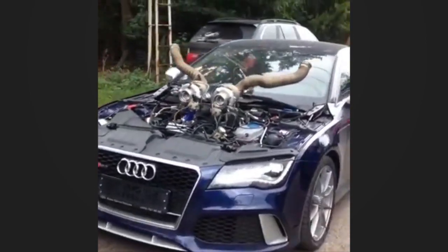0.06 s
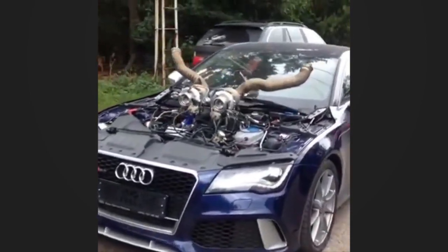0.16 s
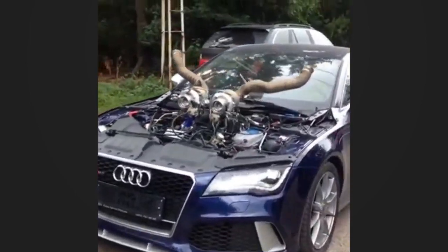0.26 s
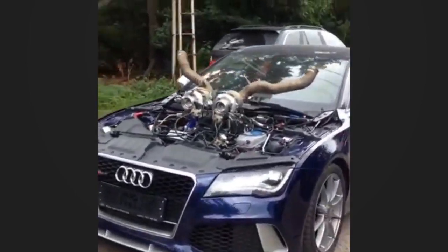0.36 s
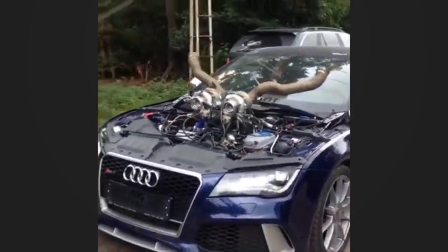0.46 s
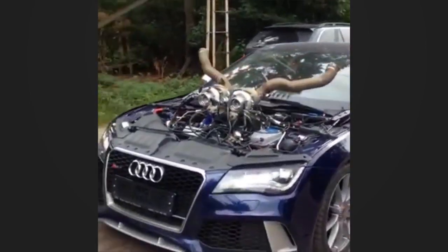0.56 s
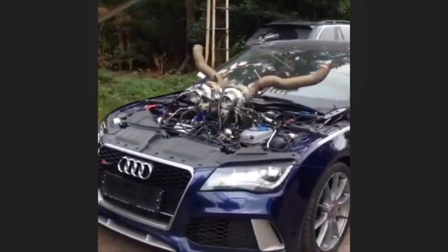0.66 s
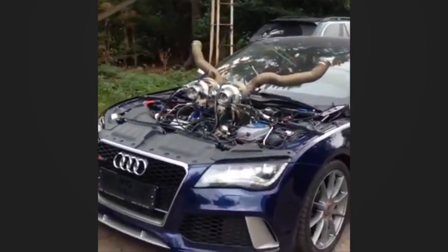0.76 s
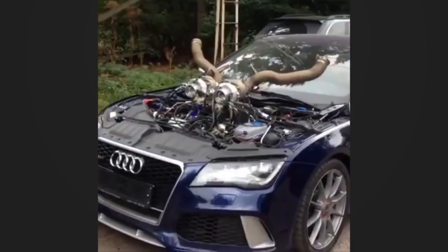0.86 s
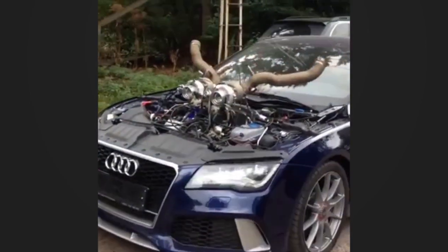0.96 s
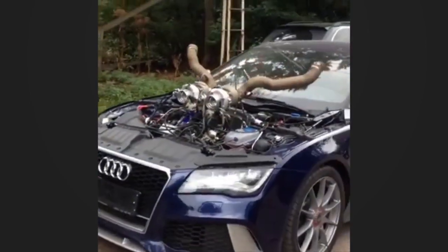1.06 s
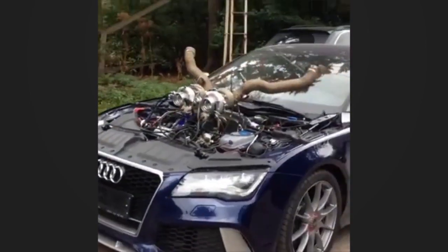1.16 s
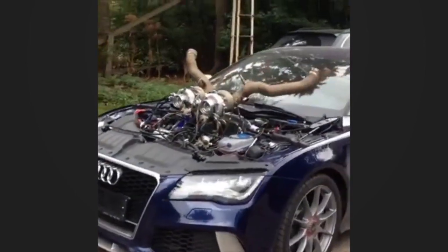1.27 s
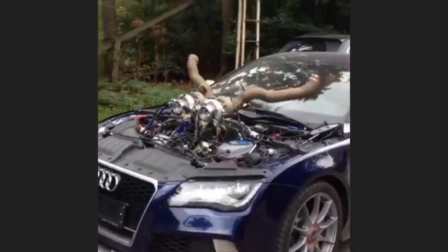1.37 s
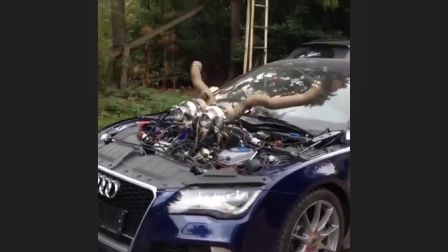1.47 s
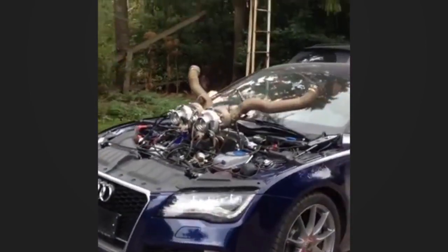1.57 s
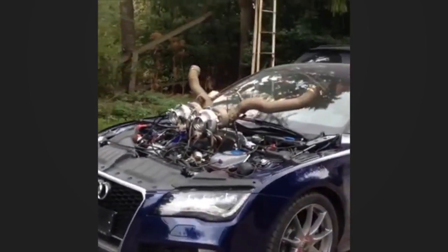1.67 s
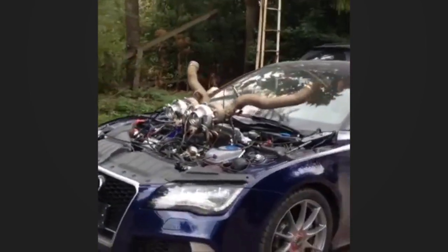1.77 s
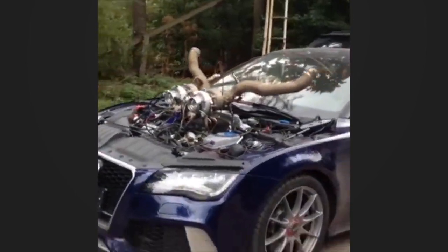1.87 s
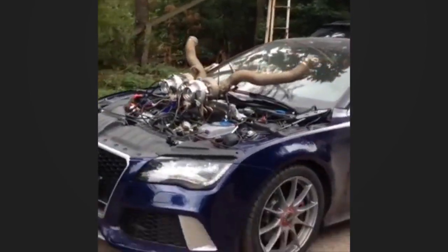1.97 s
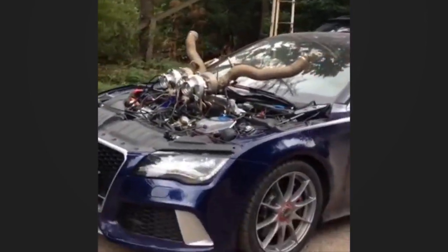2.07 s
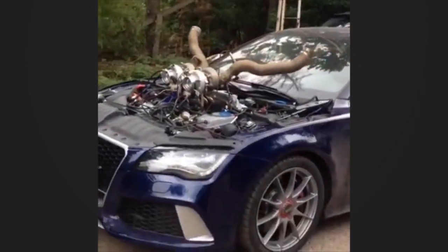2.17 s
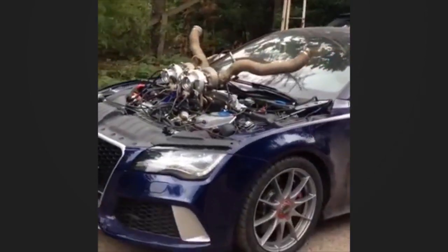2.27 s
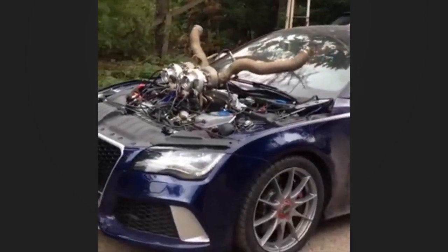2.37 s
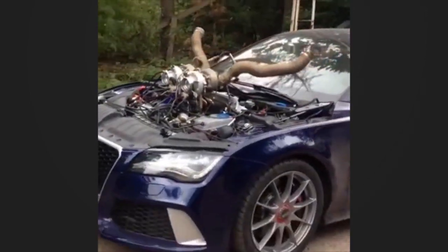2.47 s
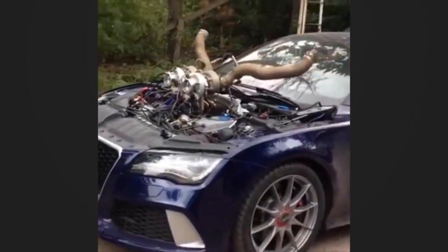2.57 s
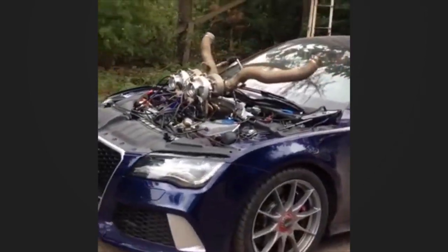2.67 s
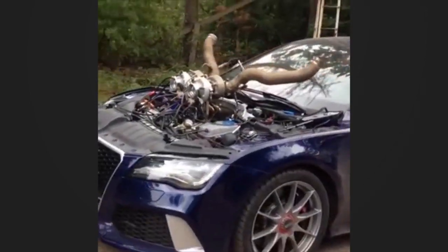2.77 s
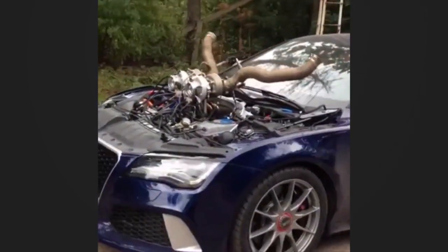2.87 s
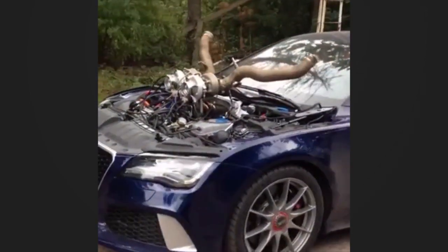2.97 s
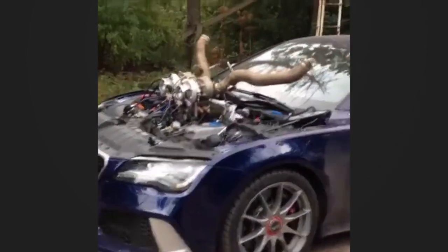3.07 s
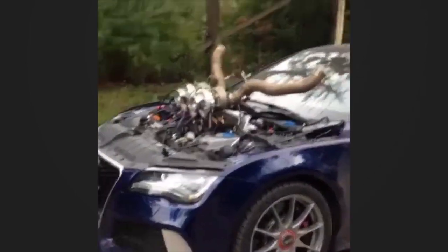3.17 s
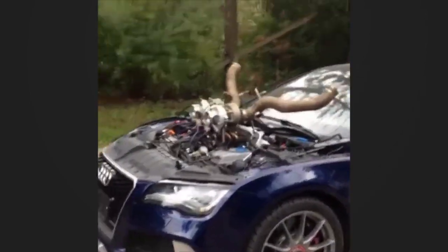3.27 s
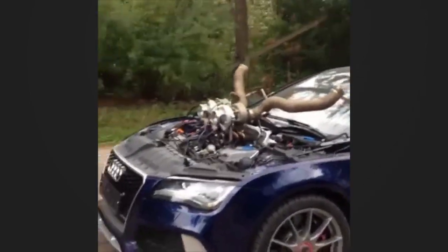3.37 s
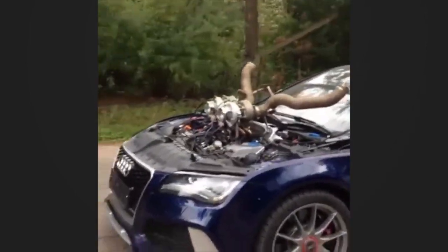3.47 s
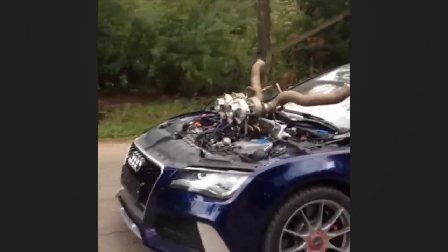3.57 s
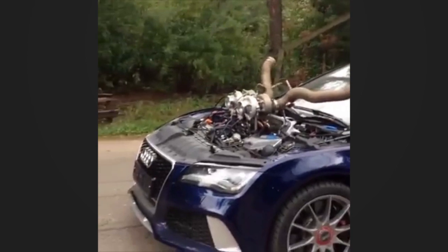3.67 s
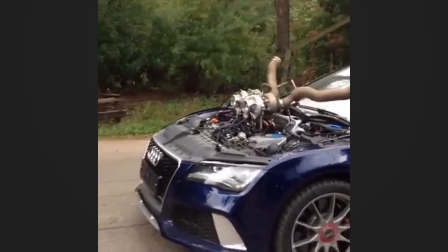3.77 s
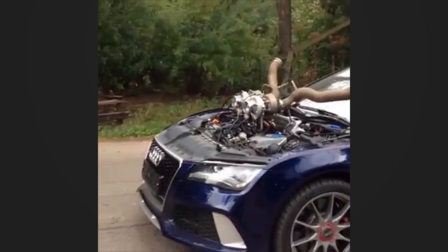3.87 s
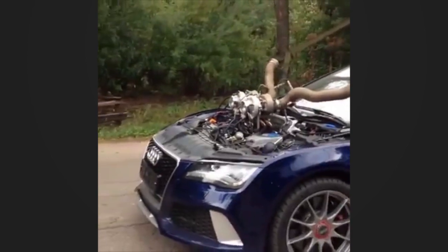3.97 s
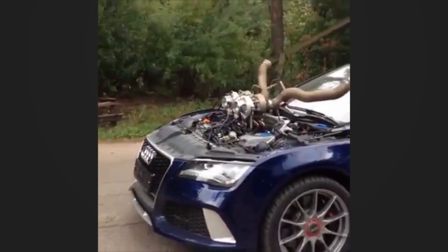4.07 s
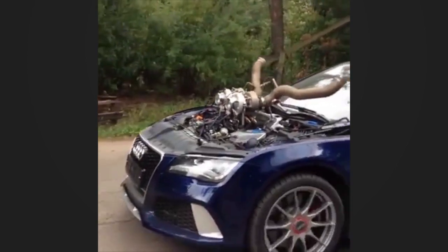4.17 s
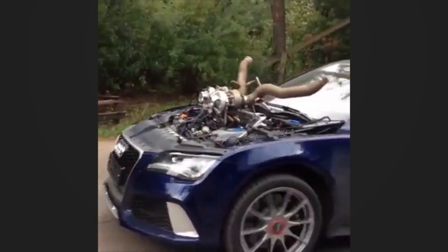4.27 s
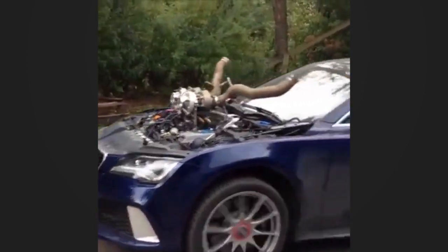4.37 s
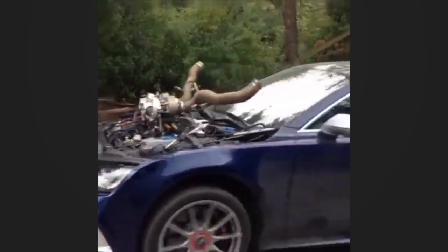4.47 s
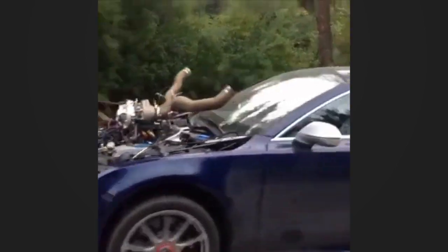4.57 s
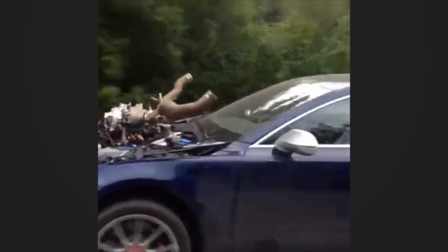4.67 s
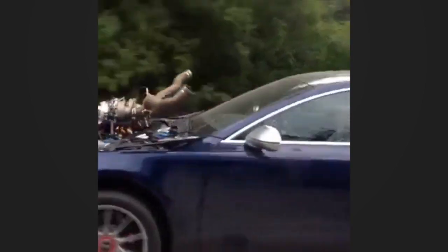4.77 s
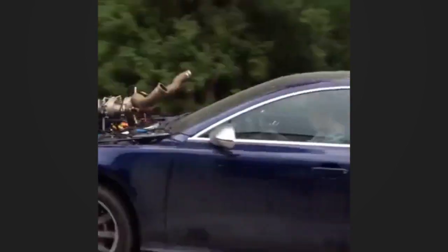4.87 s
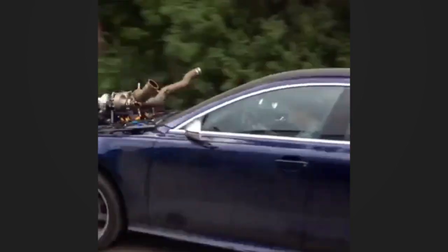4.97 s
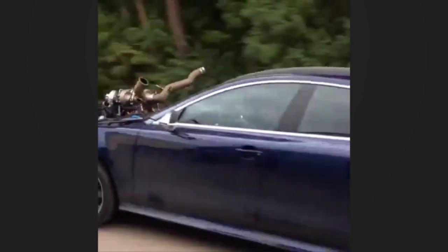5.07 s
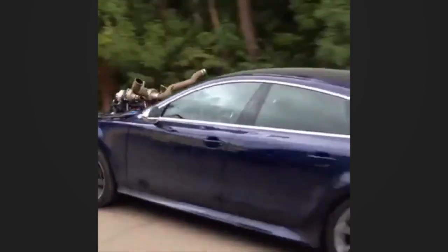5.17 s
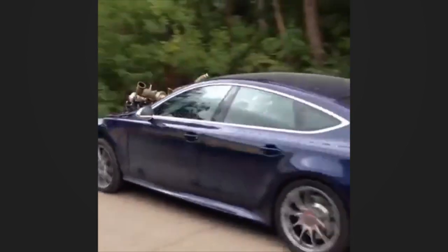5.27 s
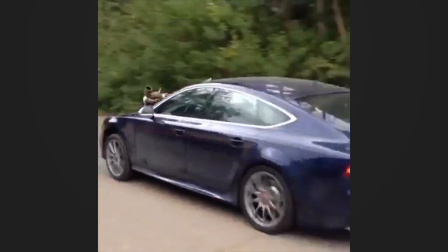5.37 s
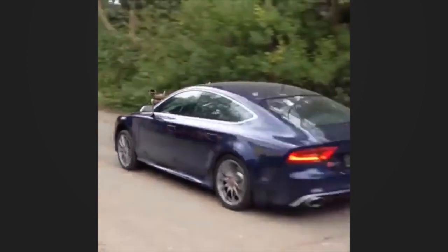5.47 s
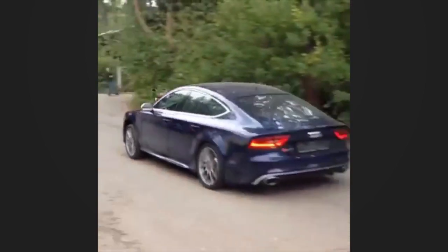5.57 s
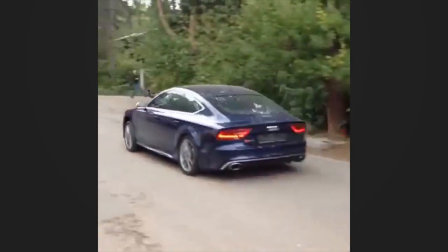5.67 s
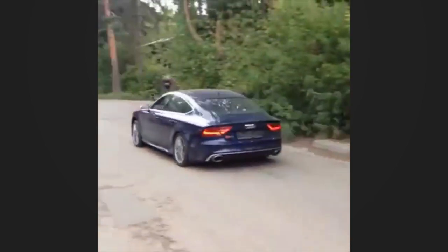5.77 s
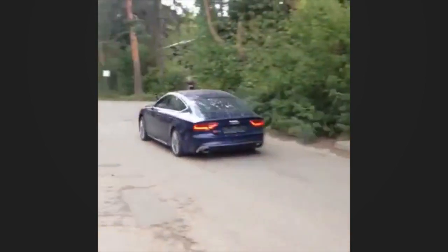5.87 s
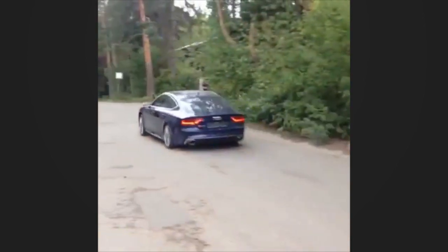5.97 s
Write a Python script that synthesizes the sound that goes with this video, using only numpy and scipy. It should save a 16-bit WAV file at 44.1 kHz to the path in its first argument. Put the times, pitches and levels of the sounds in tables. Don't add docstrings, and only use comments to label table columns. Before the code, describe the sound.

A close mono outdoor microphone hears a burbling, lumpy idle under hissing engine noise. Around three seconds the throttle snaps open with a tiny whoosh, and unmuffled exhaust roars, turbine hiss brightening. Pitch surges, hovers and dips slightly, then sweeps up as the car drives by, its tone hollowing behind the body before ragged limiter cuts. Dull tree echoes and low wind bumps surround it.

```python
import sys
import numpy as np
from scipy import signal
from scipy.io import wavfile
from scipy.ndimage import uniform_filter1d

SR = 44100
rng = np.random.default_rng(int(sys.argv[2]) if len(sys.argv) > 2 else 0)


def dump_mix(stems):
    frames = np.atleast_2d(stems).T
    limited = np.clip(frames, -1, 1)
    pcm = np.round(limited * 32767).astype(np.int16)
    wavfile.write(sys.argv[1], SR, pcm)


def ratio_of_db(decibels):
    return 10 ** (np.asarray(decibels, float) / 20)


N = 265482

FAR_BANK = [0, 1, 0, 0, 1, 0, 1, 1]
# (thump [dB], bark [dB], rasp [dB], runner delay [ms])
CYLINDERS = [(2.5, -2.5, 1.5, 0.5), (0, -9, -5.5, 0.15), (1.3, -5.5, 1.5, 0.03), (-4, 1, 0, 0.33),
             (0, -9, -10, 0.33), (1.5, -1, 1.1, 0.59), (-1, -8.5, -9.5, .02), (-2, -17, -2.5, 0.45)]
# (frequency [Hz], width [Hz], level cold at idle [dB], level under load [dB])
THUMP_MODES = [(136.3, 27, 2, -23), (177, 40, -11, -33)]
BARK_MODES = [(229, 86, -6, 10), (307.3, 35, 12, 14), (364, 20, -59, 11), (506, 33, -9, -6)]
RASP_MODES = [(720, 56, 5, -4), (1015, 30, -1, 3.5), (1397, 43, 1, 3.5), (1702, 38, 3.5, -2),
              (2028, 77, 4, -2), (2770, 540, -21, -9), (3354, 13.5, 4, 5)]
# (frequency [Hz], density [dB per Hz])
BAY_SPECTRUM = [(310, -36.5), (520, 8), (572, -0.5), (665, -10), (762, -3), (862, 1), (1390, -1),
                (1530, -7), (1960, -1), (2500, -7), (3620, -6), (5300, -9.5), (7980, -6.5), (13600, -23.5)]
# (frequency [Hz], density [dB per Hz])
RASP_SPECTRUM = [(470, 3.5), (800, 3), (1550, -1.5), (2020, 0.5), (2270, -1.5), (2620, -1.5), (6440, -1),
                 (10400, -7.5), (13600, -12.5)]
# (start [s], end [s], level [dB])
SPARK_CUTS = [
    (5.784, 5.815, -7),
    (5.852, 5.894, -7.5),
    (5.997, 6.018, -6),
]
# (delay [ms], level [dB])
ECHOES = [(4.5, -16), (38, -21), (67, -22), (109, -24)]
# (time [s], far pipe lag [ms], far pipe level [dB], mouth ring [Hz], shadow on the pipe mouths [dB])
PASSING = [(0, 2.27, -1.5, 700, -7), (2.95, 2.72, 2.5, 624, -3), (3.4, 2.65, -4, 600, 4.5),
           (4.2, 2.87, 0.5, 720, 4.5), (4.5, 2.7, -2, 670, 3), (4.65, 3.82, 2, 527, 3.5),
           (4.9, 3.98, -1, 566, 3.5), (5.02, 3.2, -17, 367, -17), (5.45, 3.66, 11.5, 437, -9.5),
           (5.6, 3.8, 9, 470, -24), (5.72, 2.64, 2, 730, -7), (6.02, 3.3, 17, 705, -12.5)]
# (time [s], length [s], level [dB], intake ring [Hz], ring width [Hz])
GULP = (2.916, .048, -31, 1160, 130)
# (time [s], level [dB])
BUFFETS = [(.38, -33), (.74, -30), (1.1, -34), (3.04, -22), (4.21, -22), (5.39, -35), (5.68, -30)]
# (time [s], engine speed [cycles per s])
IDLING = [(0, 5.48), (.9, 5.51), (1.7, 5.49), (2.98, 5.48)]
# (time [s], speed [cycles per s])
PULLING = [(2.98, 17.7), (4.05, 22.32), (4.19, 22.55), (4.35, 22.25), (4.52, 21.35), (4.75, 23.76),
           (4.91, 24.68), (4.99, 27.1), (5.31, 35.22), (5.55, 43.97), (5.71, 52.4), (5.78, 55.5),
           (6.02, 57)]
# (idle level [dB], open throttle level [dB], slope [dB per octave of revs],
# first surge [dB], change at the limiter [dB])
LAYERS = [
    (-24, -15.5, -2.5, 2, -0.5),
    (-38, -20, -1, -1, -0.5),
    (-55, -15.5, 6, -8.5, 1.7),
    (-42.5, -19.5, 3, 7.5, 1),
]
STRONG_ORDERS = [3, 5, 8]

CATCH_S, FLYWHEEL_LAG_S = 2.98, 0.145
BARK_OPENS_S, BARK_ATTACK_S = 2.99, 0.039
CRACKED_SHARE = 0.26
SURGE_DECAY_S = 0.082
REFERENCE_CYCLE_HZ, LIMITER_CYCLE_HZ = 22, 53.8
STANDING_HZ, STANDING_WIDTH_HZ, STANDING_DB, BARK_YIELDS = 146.3, 6.4, 5, 0.36
THUMP_ORDER, THUMP_LOW_HZ, THUMP_HIGH_HZ = 4.43, 76, 149
MOUTH_REST_HZ = 750
TURBINE_REST_HZ, SPOOL_HZ_PER_S, SPOOL_STARTS_S, RIDGE_DB = 3810, 1550, 3, -7.5
PASSED_S, PASSED_WIDTH_S = 4.95, 0.03
TURBINE_BEHIND_HZ = 3450
SHADED_HZ, SHADED_WIDTH_HZ, SHADED_SHARE, SHADE_LIFTS_S = 1110, 2100, 0.38, 5.65
LIMITER_RUMBLE_DB = 12
TICK_HZ, TICK_WIDTH_HZ, TICK_DB, TICKS_PER_CYCLE = 7970, 500, -56.5, 16
WHINE_HZ, WHINE_DB, WHINE_FADES_S = 1086, -52.5, 1.3


def revs(t):
    idle, = in_time(IDLING)
    pulled, = in_time(PULLING)
    return idle + (pulled - idle) * (1 - np.exp(-np.maximum(t - CATCH_S, 0) / FLYWHEEL_LAG_S))


def firings(cycle_hz, lag_ms, far_db, load):
    slots = 8 * (np.cumsum(cycle_hz) / SR - 0.014)
    shot = np.arange(int(slots[-1]))
    at = np.interp(shot, slots, np.arange(N))
    here = at.astype(int)
    ragged = (cycle_hz[here] > LIMITER_CYCLE_HZ) | (abs(cycle_hz[here] - 12) < 5.5)
    chance = rng.standard_normal((2000, 4))[shot].T * (1 - 0.55 * load[here])
    chance = chance * (1 + 2 * ragged)
    *own_db, runner_ms = np.array(CYLINDERS)[shot % 8].T
    far = np.array(FAR_BANK)[shot % 8]
    at_s = at / SR + (runner_ms + far * lag_ms[here] + 0.14 * chance[3]) / 1000
    even = 1 - 0.72 * load[here]
    thump_db = own_db[0] * even + far * far_db[here] + 2.3 * chance[0]
    bark_db = own_db[1] * even + far * far_db[here] + 2.6 * chance[1]
    rasp_db = own_db[2] * (0.15 + 0.85 * load[here]) + 1.3 * chance[2]
    return [clicks(at_s, -ratio_of_db(db)) for db in (thump_db, bark_db, rasp_db)]


def layer_levels(t, cycle_hz, shadow_db):
    opened = np.clip((t - BARK_OPENS_S) / BARK_ATTACK_S, 0, 1)
    opened = np.maximum(opened, CRACKED_SHARE * (t > GULP[0]))
    octaves = np.log2(cycle_hz / REFERENCE_CYCLE_HZ)
    surge = np.exp(-np.maximum(t - BARK_OPENS_S - BARK_ATTACK_S, 0) / SURGE_DECAY_S)
    limited = np.clip(cycle_hz - LIMITER_CYCLE_HZ, 0, 1)
    levels = []
    for idle_db, open_db, slope_db, surge_db, limit_db in LAYERS:
        driven_db = open_db + slope_db * octaves + surge_db * surge
        levels.append(idle_db + opened * (driven_db - idle_db) + limit_db * limited)
    thump, bark, ring, hiss = levels
    boom_db = STANDING_DB * sum(np.exp(-((order * cycle_hz - STANDING_HZ) / STANDING_WIDTH_HZ) ** 2)
                                for order in STRONG_ORDERS)
    return thump + boom_db, bark - BARK_YIELDS * boom_db, ring + opened * shadow_db, hiss


def muffled(x):
    return signal.sosfilt(signal.butter(5, 420, fs=SR, output="sos"), x)


def exhaust_thump(shots, cycle_hz, load):
    hz = np.clip(THUMP_ORDER * cycle_hz, THUMP_LOW_HZ, THUMP_HIGH_HZ)
    fixed_modes = pipe(shots, THUMP_MODES[1:], load) - pipe(shots, THUMP_MODES[:1], load)
    thump = muffled(moving(moving(shots, hz, width_hz=62) + fixed_modes, hz, width_hz=170))
    rounder = signal.sosfilt(signal.butter(3, 200, fs=SR, output="sos"), thump)
    return evened(load * thump - (1 - load) * rounder)


def exhaust_bark(shots, load):
    bark = resonance(pipe(shots, BARK_MODES, load), 310, 300)
    return evened((1 - load) * muffled(bark) + load * bark)


def mouth_ring(t, shots, mouth_hz):
    hz = np.where(t < CATCH_S, MOUTH_REST_HZ, mouth_hz)
    ring = moving(shots, hz, width_hz=240)
    ring = moving(ring, hz * 1.04, width_hz=200)
    return evened(moving(ring, hz * 0.88, width_hz=240))


def rasp(shots, load, ridge_hz):
    fall, rise = np.exp(-1 / (0.005 * SR)), np.exp(-1 / (0.0015 * SR))
    puffs = signal.lfilter([1], [1, -fall], -shots)
    gust = evened(signal.lfilter([1 - rise], [1, -rise], puffs))
    steady = 2.6 - 1.9 * load
    bay_hiss = np.sqrt(1 - load) * coloured(BAY_SPECTRUM, patchy_db=1.0)
    gas_hiss = np.sqrt(load) * coloured(RASP_SPECTRUM, patchy_db=2.64)
    gated = (bay_hiss + gas_hiss) * (steady + gust)
    rings = 0.9 * ratio_of_db(2.2 * drift(5)) * pipe(gated, RASP_MODES, load)
    ridge = ratio_of_db(RIDGE_DB) * moving(gated, ridge_hz, width_hz=380)
    return evened(gated + rings + ridge)


def turbine_hz(t):
    spooled = TURBINE_REST_HZ + SPOOL_HZ_PER_S * np.maximum(t - SPOOL_STARTS_S, 0)
    return spooled + gone_by(t, PASSED_S) * (TURBINE_BEHIND_HZ - spooled)


def gone_by(t, at_s):
    return 0.5 + 0.5 * np.tanh((t - at_s) / PASSED_WIDTH_S)


def shaded(t, x):
    between = gone_by(t, PASSED_S) - gone_by(t, SHADE_LIFTS_S)
    return x - SHADED_SHARE * between * resonance(x, SHADED_HZ, SHADED_WIDTH_HZ)


def spark():
    gain = np.ones(N)
    for start_s, end_s, depth_db in SPARK_CUTS:
        gain[round(start_s * SR):round(end_s * SR)] = ratio_of_db(depth_db)
    return uniform_filter1d(gain, size=60)


def limiter_rumble(cycle_hz, thump_db):
    thud = resonance(resonance(rng.standard_normal(N), 130, 200), 130, 200)
    return ratio_of_db(thump_db - 18 + LIMITER_RUMBLE_DB * (cycle_hz > LIMITER_CYCLE_HZ)) * rms_one(thud)


def gulp():
    start_s, length_s, level_db, hz, width_hz = GULP
    age = np.clip((np.arange(N) / SR - start_s) / length_s, 0, 1)
    bright = signal.butter(2, [800, 13000], "band", fs=SR, output="sos")
    air = signal.sosfilt(bright, rng.standard_normal(N))
    return ratio_of_db(level_db) * np.sin(np.pi * age) ** 0.6 * (air + 10 * resonance(air, hz, width_hz))


def bay(t, cycle_hz):
    turns = TICKS_PER_CYCLE * np.cumsum(cycle_hz) / SR
    at_s = np.interp(np.arange(1, int(turns[-1])), turns, t)
    chance = rng.standard_normal((4000, 2))[:len(at_s)].T
    taps = clicks(at_s + 0.0014 * chance[0], ratio_of_db(7.4 * chance[1]))
    burst = signal.lfilter([1], [1, -0.97], taps) * rng.standard_normal(N)
    ticks = ratio_of_db(TICK_DB) * evened(resonance(burst, TICK_HZ, TICK_WIDTH_HZ))
    whine = ratio_of_db(WHINE_DB + 2 * drift(7.1)) * np.sin(2 * np.pi * WHINE_HZ * t)
    return ticks + whine / (1 + (t / WHINE_FADES_S) ** 4)


def roadside(x):
    dull, out = signal.lfilter([0.25], [1, -0.75], x), x.copy()
    for ms, echo_db in ECHOES:
        lag = round(ms * SR / 1000)
        out[lag:] += ratio_of_db(echo_db) * dull[:-lag]
    return out


def wind():
    t = np.arange(N) / SR
    lumps = ratio_of_db(-42 + 3.5 * drift(4))
    swell = lumps + sum(ratio_of_db(db) * np.exp(-((t - s) / 0.025) ** 2) for s, db in BUFFETS)
    return swell * rms_one(resonance(resonance(rng.standard_normal(N), 42, 60), 42, 60))


def clicks(at_s, sizes):
    at = np.clip(at_s * SR, 0, N - 2)
    whole = at.astype(int)
    part = at - whole
    return np.bincount(whole, sizes * (1 - part), N) + np.bincount(whole + 1, sizes * part, N) + 1e-18


def peak_taps(r):
    return np.array([1, 0, -1]) * (1 - r * r) / 2


def resonance(x, hz, width_hz):
    r = np.exp(-np.pi * width_hz / SR)
    return signal.lfilter(peak_taps(r), [1, -2 * r * np.cos(2 * np.pi * hz / SR), r * r], x)


def moving(x, hz, width_hz):
    r, state, out = np.exp(-np.pi * width_hz / SR), np.zeros(2), np.empty(N)
    for i in range(0, N, 128):
        poles = [1, -2 * r * np.cos(2 * np.pi * hz[i] / SR), r * r]
        out[i:i + 128], state = signal.lfilter(peak_taps(r), poles, x[i:i + 128], zi=state)
    return out


def pipe(x, modes, load):
    return sum(ratio_of_db(cold_db + (hot_db - cold_db) * load) * resonance(x, hz, width_hz)
               for hz, width_hz, cold_db, hot_db in modes)


def coloured(spectrum, patchy_db):
    edges = 400 * 2 ** np.arange(0, 5.4, 1 / 3)
    out, white = 0, rng.standard_normal((2, N))
    hz, level_db = np.transpose(spectrum)
    for k, (low, high) in enumerate(zip(edges, edges[1:])):
        band = signal.sosfilt(signal.butter(2, [low, high], "band", fs=SR, output="sos"), white[k % 2])
        band_db = np.interp(np.log(low * high) / 2, np.log(hz), level_db)
        out = out + band * ratio_of_db(band_db + patchy_db * drift(26))
    return rms_one(out)


def drift(rate):
    r = np.exp(-80 * np.pi * rate / SR)
    slow = signal.lfilter([1], [1, -2 * r, r * r], rng.standard_normal(N // 40 + 2002))[2000:]
    return np.interp(np.arange(N) / 40, np.arange(len(slow)), rms_one(slow))


def rms_one(x):
    return x / np.sqrt(np.mean(x ** 2) + 1e-20)


def evened(x, span_s=0.21):
    size = round(span_s * SR)
    power = uniform_filter1d(uniform_filter1d(x ** 2, size=size), size=size)
    return x / np.sqrt(power + 1e-20)


def in_time(rows):
    s, *columns = np.transpose(rows)
    return [np.interp(np.arange(N) / SR, s, column) for column in columns]


def scene():
    t = np.arange(N) / SR
    cycle_hz = revs(t)
    load = np.clip((cycle_hz - 5.6) / 4.5, 0, 1)
    lag_ms, far_db, mouth_hz, shadow_db = in_time(PASSING)
    thump_db, bark_db, ring_db, rasp_db = layer_levels(t, cycle_hz, shadow_db)
    thumps, barks, gusts = firings(cycle_hz, lag_ms, far_db, load)
    exhaust = ratio_of_db(thump_db) * exhaust_thump(thumps, cycle_hz, load)
    exhaust += ratio_of_db(bark_db) * exhaust_bark(barks, load)
    exhaust += ratio_of_db(ring_db - 10) * mouth_ring(t, gusts, mouth_hz)
    exhaust += ratio_of_db(rasp_db) * shaded(t, rasp(gusts, load, turbine_hz(t)))
    engine = exhaust * spark() + limiter_rumble(cycle_hz, thump_db) + gulp() + bay(t, cycle_hz)
    return (ratio_of_db(-1.44) * roadside(engine) + wind())[None]


def roll_off(x):
    return signal.sosfilt(signal.butter(12, 15710, fs=SR, output="sos"), x)


def record(dry):
    x = signal.sosfilt(signal.butter(2, 42, "high", fs=SR, output="sos"), dry)
    x = 1.682 * np.tanh(x / 1.086)
    low = signal.sosfilt(signal.ellip(12, 0.3, 60, 13930, fs=SR, output="sos"), x)
    top = signal.sosfilt(signal.ellip(8, 0.3, 60, [13960, 15750], "band", fs=SR, output="sos"), x)
    return roll_off(low + ratio_of_db(-13.5) * top)


dry = scene()
out = record(dry)
dump_mix(out)
```